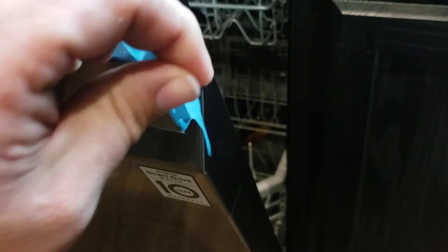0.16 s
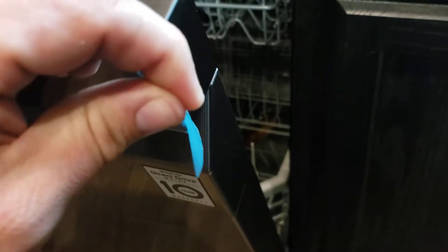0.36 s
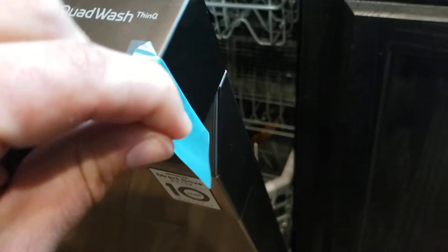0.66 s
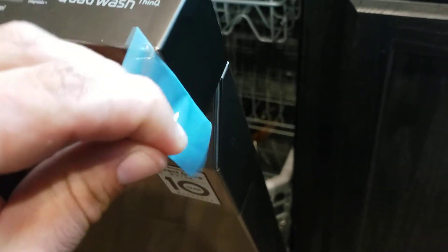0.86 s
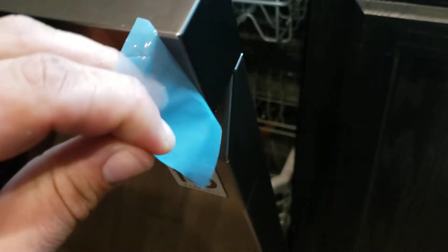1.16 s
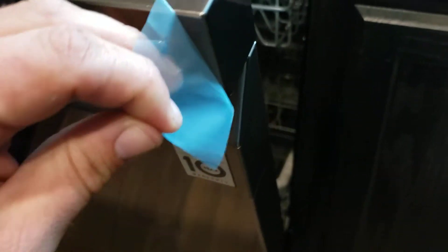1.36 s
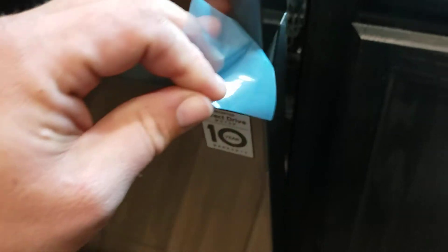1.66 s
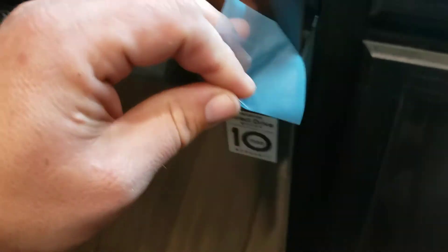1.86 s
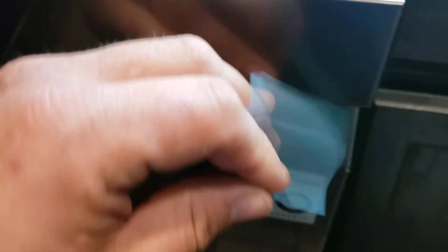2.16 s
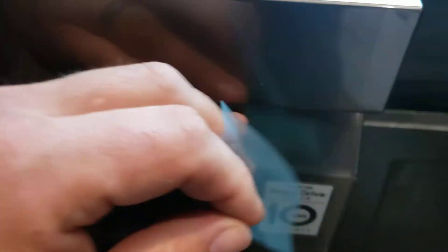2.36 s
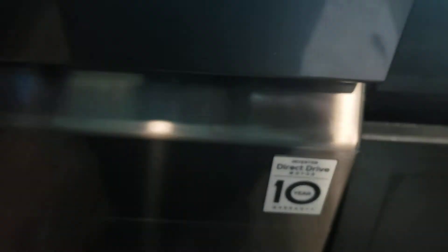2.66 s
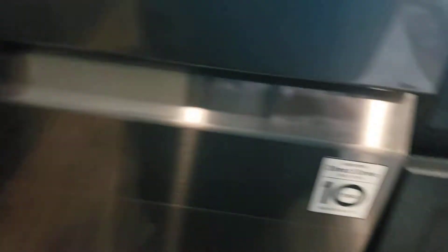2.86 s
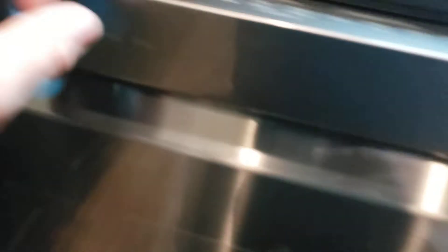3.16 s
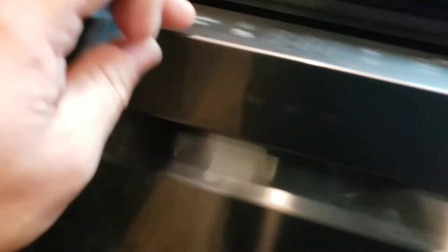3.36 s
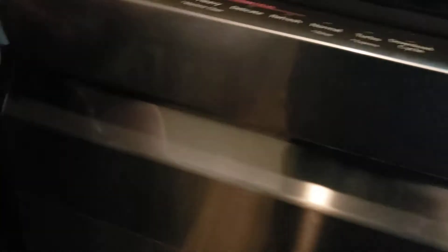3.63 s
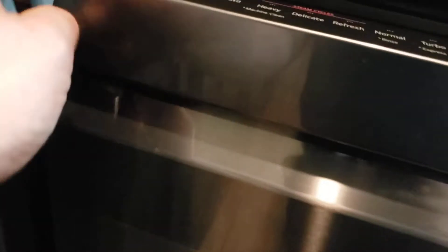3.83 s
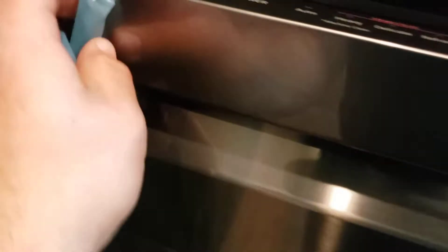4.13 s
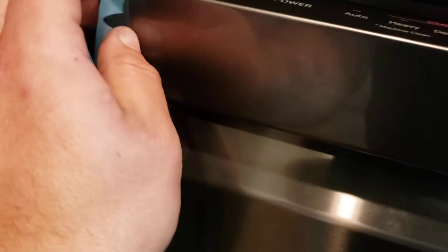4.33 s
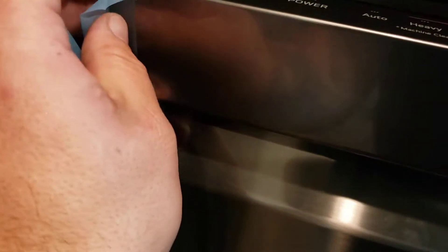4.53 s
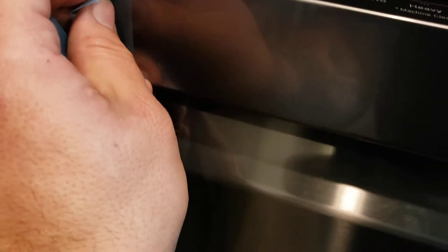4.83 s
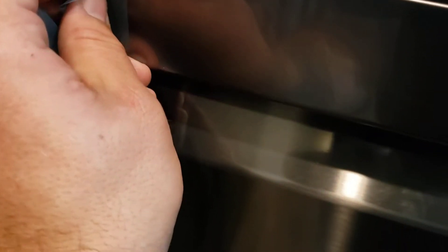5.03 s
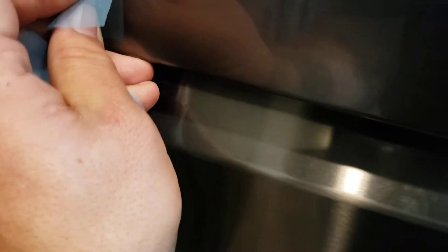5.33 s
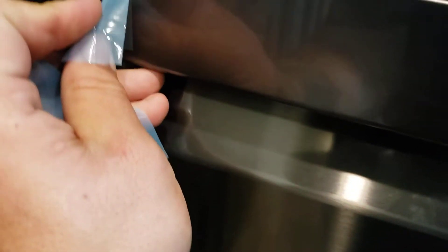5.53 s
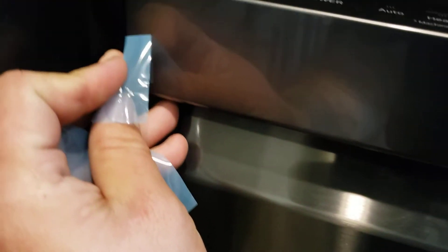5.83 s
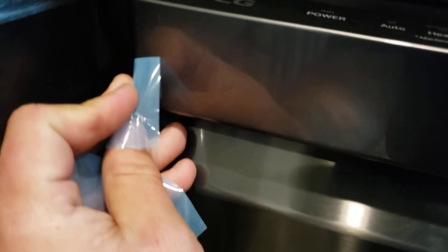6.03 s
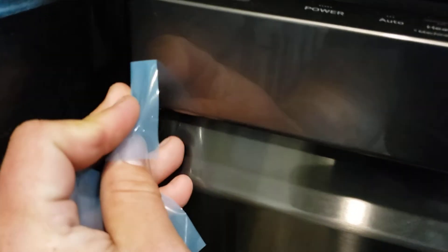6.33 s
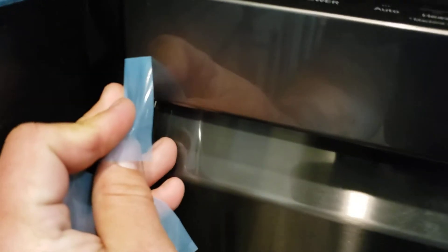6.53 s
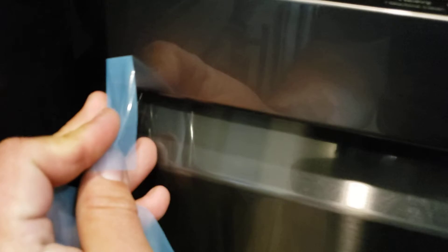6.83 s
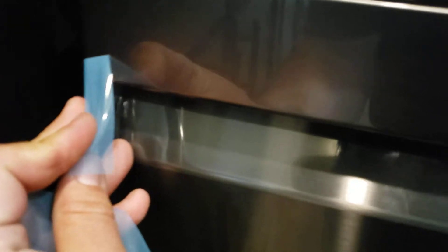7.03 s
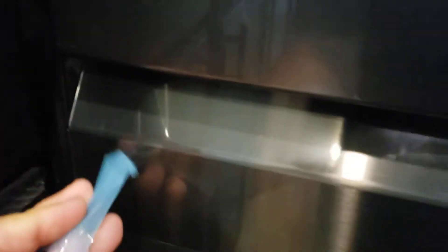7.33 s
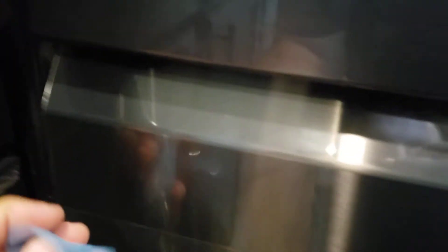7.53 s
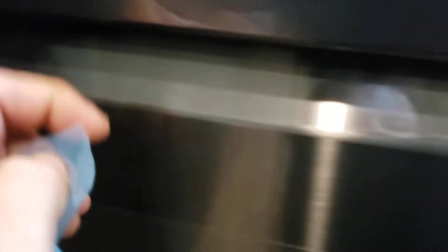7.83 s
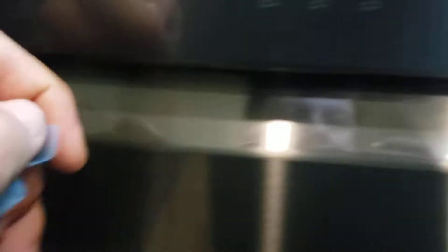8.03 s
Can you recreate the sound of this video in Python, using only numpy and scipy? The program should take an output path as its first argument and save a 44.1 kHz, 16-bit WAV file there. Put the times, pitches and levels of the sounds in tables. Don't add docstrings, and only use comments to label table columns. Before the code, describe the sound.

A handheld stereo phone sits a hand's width from sticky film on a steel door in a quiet kitchen, the right side brighter. Light rustle opens; at 0.2 s a corner jumps off with a sharp snap and low air puff. Cracks cluster at 0.85-0.9 s with another thump, then a loud quick rip at 1.0 s splashes into the room. Sparse faint ticks follow, with a harder pop near 2.2 s and a barely audible finger squeak around 2.8 s. Crackles resume at 3.3-3.5 s. From 3.7 to 4.9 s a nail picks in busy hard snaps, strongest around 4.1 and 4.4 s. It thins to near quiet, with single pops at 5.7, 6.5 and 6.7 s. From 7.1 s the strip tears free in dense crackling and rustling, then crumples brightly, peaking at 8.0-8.15 s. Faint fridge hum and grip rumble continue underneath, the hum fading near the end.

```python
import sys
import numpy as np
from scipy import signal
from scipy.fft import rfft, irfft, next_fast_len
from scipy.io import wavfile
from scipy.ndimage import uniform_filter1d

SR = 44100
rng = np.random.default_rng(int(sys.argv[2]) if len(sys.argv) > 2 else 0)


def natural_amplitude(level_db):
    exponent = np.asarray(level_db, float) / 20
    return 10 ** exponent


def master(y):
    cut = np.clip(np.atleast_2d(y).T, -1, 1)
    pcm = np.round(cut * 32767)
    wavfile.write(sys.argv[1], SR, pcm.astype(np.int16))


N = 361179
SPAN = 2048


def gains(table, size):
    hz, db = np.transpose(table)
    bins = np.fft.rfftfreq(size, 1 / SR)
    return natural_amplitude(np.interp(np.log(bins + 1), np.log(hz + 1.), db))


def colour(x, table):
    size = next_fast_len(N)
    return irfft(rfft(x, size) * gains(table, size), size)[..., :N]


def unit(x):
    return x / np.sqrt(np.mean(x ** 2, -1, keepdims=True))


def curves(table):
    s, *columns = np.transpose(table)
    return [np.interp(np.arange(N) / SR, s, c) for c in columns]


def walk(rate):
    hold = int(SR / rate)
    steps = np.repeat(rng.standard_normal(N // hold + 1), hold)
    return unit(uniform_filter1d(uniform_filter1d(steps, hold), hold)[:N])


def lay(s, bursts):
    out = np.zeros(N + SPAN)
    np.add.at(out, (s * SR).astype(int)[:, None] + np.arange(SPAN), bursts)
    return out[:N]


def creases(rate, spread_db, size):
    when, luck = rng.random((2, size))
    sizes = natural_amplitude(-spread_db * np.log(luck + 1e-3))
    return unit(uniform_filter1d((when < rate / SR) * sizes, size=40))


# t/s, right level/dB, patch f/Hz, treble/dB
JUMP = [
    (0.1856, -19.5, 5500, 6.2),
    (0.19, -35.5, 5200, 10),
    (0.217, -27.5, 4900, 5.6),
]
# t/s, right level/dB, patch f/Hz, treble/dB
RIPS = [
    (1.0077, -17, 5770, -0.5),
    (1.0159, -17, 5380, -1.5),
    (1.0229, -15, 5510, 2.5),
]
# t/s, right level/dB, patch f/Hz, treble/dB
LIFTING = [(0.544, -51, 5070, 7.5), (0.682, -61.5, 6500, 21.5), (0.4894, -39, 3510, -13),
           (0.604, -29.5, 5000, 13), (0.632, -39.5, 5560, 20), (0.773, -41.5, 4040, 13),
           (0.8391, -21.5, 4470, -1.5), (0.8714, -17, 5650, 2), (0.896, -15, 6330, 1.5),
           (1.371, -49, 5700, 11), (2.935, -51, 4500, -9), (1.118, -35.5, 1610, -11),
           (1.202, -26.5, 5640, -10.5), (1.575, -39, 1420, -11.5), (2.066, -38, 4440, -3.5),
           (2.1256, -32.5, 3730, 7), (2.1937, -21.5, 4730, 10), (2.2096, -16.5, 4600, -12),
           (2.7585, -41, 3300, -13), (3.118, -37, 2810, -19), (3.281, -35.5, 3440, 12),
           (3.3151, -28, 6430, 0), (3.318, -34, 2730, 2), (3.363, -36, 5240, 8), (3.3777, -25.5, 2770, 3),
           (3.48, -28, 5900, 10), (3.489, -26, 3400, -9), (3.5111, -18.5, 4650, -2.5),
           (3.5429, -25.5, 4260, 1)]
# t/s, right level/dB, patch f/Hz, treble/dB
PICKING = [(3.725, -33, 4750, -3.5), (3.7457, -24.5, 5800, 34), (3.818, -25, 4800, -4.5),
           (3.8382, -25.5, 6000, -2.5), (3.858, -31, 3880, 14), (4.039, -36.5, 5160, -6),
           (4.1093, -7, 4900, -54.5), (4.1173, -22.5, 5030, -6.5), (4.132, -29.5, 4500, -18.5),
           (4.138, -15.5, 4700, -7), (4.14, -16, 4940, -16), (4.1425, -13, 5540, -38),
           (4.145, -13.5, 5200, -14.5), (4.264, -34, 4670, -38.5), (4.332, -36.5, 4430, -11),
           (4.3405, -27, 4900, -3), (4.3626, -34, 4720, -17), (4.4081, -9.5, 5400, -24.5),
           (4.4853, -18.5, 5300, -5), (4.533, -20.5, 5800, 10), (4.58, -25.5, 5140, -1),
           (4.585, -26, 5300, -6), (4.6156, -32.5, 3280, 1), (4.634, -29, 4000, -5),
           (4.7181, -27.5, 4070, -9), (4.758, -22.5, 3970, -3.5), (4.763, -30.5, 5640, 14),
           (4.775, -17.5, 3820, -3), (4.7803, -22.5, 3780, 10), (4.8486, -22, 5000, -1),
           (4.8504, -25.5, 5200, -5.5), (4.845, -32, 4500, 2), (4.9127, -15.5, 5030, 1)]
# t/s, right level/dB, patch f/Hz, treble/dB
PULLING = [(5.541, -29.5, 3830, -8), (5.601, -31.5, 5840, -4), (5.6746, -30, 6630, -1),
           (5.6823, -16.5, 6200, 0), (5.708, -30, 5370, -3), (6.2438, -33, 2460, -14),
           (6.495, -21.5, 5580, -0.5), (6.7087, -20.5, 4740, -8.5), (6.8399, -26.5, 5500, -5),
           (7.1268, -12.5, 4800, 0), (7.149, -20.5, 4100, -9), (7.2035, -15.5, 6000, 4),
           (7.208, -24.5, 3940, 11), (7.2195, -23, 5870, 8), (7.244, -18.5, 3530, -0.5),
           (7.2596, -19.5, 1210, 14), (7.2663, -21.5, 4500, 11), (7.3033, -31, 1250, 2),
           (7.33, -30.5, 2850, 0), (7.356, -33, 1770, -13), (7.374, -26, 7000, 10), (7.4113, -23, 6240, 15),
           (7.4479, -26, 4650, 20), (7.463, -25, 5000, 26), (7.4828, -34, 980, 15), (7.4977, -27, 4070, 12),
           (7.5086, -24.5, 5860, 19), (7.542, -24.5, 4030, 15), (7.5515, -26.5, 5430, 15)]
# t/s, right level/dB, patch f/Hz, treble/dB
CRUMPLING = [(7.5806, -32, 1780, 19), (7.5872, -28, 4850, -3), (7.645, -26.5, 5500, -6),
             (7.664, -30, 5600, -20), (7.676, -25, 4900, -31), (7.7006, -20.5, 5650, 2.5),
             (7.7197, -31, 5900, 2), (7.7036, -25.5, 5230, 4), (7.7266, -16, 5560, 0.5),
             (7.785, -23, 3680, -0.5), (7.9946, -22.5, 4200, -4), (8.006, -23, 5340, 16),
             (8.011, -33, 5900, 11), (8.0245, -17.5, 5500, 12), (8.0356, -13, 5760, -3.5),
             (8.0421, -12.5, 3500, -15), (8.0561, -16, 3480, -9), (8.068, -22, 2050, 15),
             (8.0792, -12, 3210, -0.5), (8.1087, -20, 4500, -7.5), (8.1118, -23.5, 2120, 20),
             (8.134, -11.5, 5060, -2.5), (8.1557, -23, 7200, 0), (8.1599, -27.5, 5900, 9.5),
             (8.174, -28, 5600, 1), (8.075, -25, 5000, 0), (8.188, -32, 1820, -12)]
# t/s, level/dB, patch f/Hz
TICKS = [(0.5098, -39, 5150), (0.853, -48, 6070), (1.2684, -49, 3470), (1.446, -44.5, 1510),
         (1.88, -56.5, 5470), (2.53, -50.5, 4700), (2.711, -47, 4970), (2.889, -47.5, 5460),
         (3.2945, -46, 3140), (3.348, -38, 5770), (3.4575, -42.5, 5530), (3.506, -27, 6750),
         (3.7004, -47, 5630), (3.766, -42, 4910), (4.014, -53, 5760), (4.677, -45, 7500),
         (4.404, -23, 4500), (5.3235, -37, 3800), (5.403, -39.5, 2660), (5.7792, -47, 6200),
         (5.802, -49, 6420), (5.919, -43.5, 5800), (6.28, -42.5, 5470), (6.3564, -46.5, 5880),
         (6.402, -41, 1680), (6.7968, -51, 6550), (6.9185, -35, 5630), (7.905, -40.5, 5300),
         (0.82, -47, 3500), (1.5765, -40.5, 4350), (2.465, -47.5, 4740), (2.727, -48, 3980),
         (2.769, -45, 3500), (2.794, -52, 3500), (2.901, -46.5, 2300), (3.2562, -60, 6030),
         (3.3403, -41, 5620), (3.629, -49, 6000), (3.708, -57, 5550), (5.0493, -52.5, 4870),
         (5.386, -48, 5220), (5.5176, -55.5, 4910), (5.98, -52.5, 5880), (6.019, -48, 6540),
         (6.0674, -52, 3800), (6.225, -57, 6500), (6.3318, -60, 6500), (6.813, -52, 6660),
         (7.0295, -45, 2860), (7.972, -54, 3680), (8.0091, -20.5, 5320), (6.65, -54, 6550),
         (5.8704, -58, 6800), (5.82, -53, 4570), (2.185, -58, 6500), (0.59, -53, 3000), (4.313, -51, 4500),
         (4.767, -34, 4500), (4.802, -38, 2500), (5.1, -51, 3000), (5.243, -61, 7400)]
# t/s, right level/dB, patch f/Hz,
# length/s
ZIPS = [(0.198, -32, 5830, 0.013), (1.024, -31.5, 3960, 0.045), (1.428, -58, 5500, 0.0044),
        (1.441, -47.5, 5660, 0.0048), (1.485, -57, 6540, .005), (1.585, -45.5, 1070, 0.0069),
        (1.586, -44.5, 4770, 0.0022), (1.606, -54, 1280, 0.013), (1.62, -55.5, 4800, 0.026),
        (2.195, -37, 4970, 0.027), (2.706, -56, 4300, 0.012), (2.748, -53.5, 2460, 0.04),
        (2.894, -48, 4860, 0.0063), (3.209, -54, 4970, 0.0046), (3.27, -53, 2300, 0.008),
        (3.287, -45.5, 4150, 0.0099), (3.471, -40.5, 3040, 0.0063), (3.496, -25, 3440, 0.02),
        (3.51, -18.5, 4400, 0.0045), (3.736, -50, 4800, 0.014), (4.045, -51.5, 5060, 0.016),
        (6.244, -43, 5260, 0.0092), (6.246, -44.5, 2600, 0.0074), (7.208, -18, 5140, 0.0029),
        (7.265, -29.5, 3140, 0.0089), (7.443, -38, 4500, 0.003), (7.448, -36, 3240, .008),
        (7.5165, -33, 4300, .004), (7.57, -37.5, 4970, 0.034), (7.698, -26, 5600, 0.0044),
        (7.7, -30, 2050, 0.0052), (7.722, -22, 5470, 0.008), (7.725, -27, 2290, 0.012),
        (8.042, -20, 5330, 0.0025), (8.068, -20.5, 1910, 0.0025), (8.079, -31, 1940, .008),
        (8.106, -40, 1800, 0.012), (4.136, -28, 4960, 0.0073), (5.68, -28, 2450, 0.0094),
        (3.38, -34.5, 5670, 0.0089), (3.743, -37, 3900, 0.0079), (3.839, -39.5, 4500, 0.025),
        (7.22, -35.5, 1000, 0.03), (7.283, -43, 1110, 0.031), (7.596, -40.5, 2480, 0.018),
        (6.837, -49.5, 895, 0.0089),
        (7.631, -45, 5000, .003), (2.559, -60, 3900, 0.0067), (5.121, -59, 4600, .004),
           (4.324, -44, 4300, .008), (4.342, -48.5, 3100, 0.0037), (8.112, -26, 1830, .006),
           (7.543, -30, 3800, 0.0044), (4.4, -57, 1400, .004), (4.5, -44.5, 950, 0.012),
           (6.495, -26, 2350, 0.0017), (3.867, -29, 3850, 0.0029), (3.28, -41, 2530, 0.01),
           (0.94, -48.5, 8000, 0.0068), (0.92, -46.5, 4500, .004), (7.31, -46, 2500, .02),
           (8.1, -44, 1600, 0.0063), (1.6, -58, 3700, .004)]
SCATTER_DB = [
    -11.5,
    -13,
    -19,
    -21,
    -20,
    -20,
    -14.5,
    -16.5,
]
LOWEST_HZ = [
    4002,
    403,
    489,
    997.5,
    901,
    1500,
    1007,
    0,
]


def releases():
    treble_per_octave_db, zip_treble_db, zip_lowest_share = 12, -0.5, 0.6
    ticks = [(s, db, hz, treble_per_octave_db * np.log2(hz / 5000)) for s, db, hz in TICKS]
    runs = ZIPS
    zips = [(s, db, hz, zip_treble_db + treble_per_octave_db * np.log2(hz / 5000)) for s, db, hz, _ in runs]
    tables = (JUMP, RIPS, LIFTING, PICKING, PULLING, CRUMPLING, ticks, zips)
    rows = []
    for table, scatter, lowest in zip(tables, SCATTER_DB, LOWEST_HZ):
        rows += [tuple(row) + (scatter, lowest) for row in table]
    s, db, hz, treble_db, scatter_db, low_hz = np.transpose(rows)
    scatter_db = scatter_db + 0.33 * np.clip(treble_db, -15, 10) + 0.1251 * (db + 14.5)
    length = np.r_[np.zeros(len(s) - len(zips)), [row[-1] for row in runs]]
    low_hz = np.where(length > 0, zip_lowest_share * hz, low_hz)
    return s, db, hz, treble_db, scatter_db, low_hz, length


def tears(hz, length, lead):
    t = np.arange(SPAN) / SR
    slow = 0.00065 * (5000 / hz) ** 0.5
    creep = 0.96 * np.exp((t - lead) / 0.0003) + 0.04 * t / lead
    let_go = np.exp(np.minimum(lead + length - t, 0) / slow)
    stutter = 0.35 + creases(500, 2.5, len(hz) * SPAN).reshape(-1, SPAN)
    return np.where(t < lead, creep, let_go) * np.where(length > 0, stutter, 1)


# f/Hz, level/dB
TAIL = [(2100, 1), (2800, 0.5), (3300, -3.5), (4300, -2), (6800, -5.5), (8800, -8.5), (11500, -5)]


def splash(sent, room_db=-14):
    t = np.arange(SR // 2) / SR
    quick = np.exp(-np.log(1000) * t / 0.07)
    room = natural_amplitude(room_db) * np.exp(-np.log(1000) * t / 0.5)
    echo = rng.standard_normal((2, len(t))) * (quick + room) * natural_amplitude(-15.5)
    wet = colour(signal.fftconvolve(sent[None], echo, axes=1)[:, :N], TAIL)
    return wet * (0.8 + 0.35 * creases(600, 2.5, N))


# f/Hz, level per Hz/dB
FILM = [(180, -36), (300, -19.5), (460, -11.5), (937, 1), (1500, 0.5), (1700, 1.5), (3670, 5.5), (4420, 0),
        (5170, 7.5), (9000, -7), (11700, -26), (19800, -120)]
# f/Hz, level per Hz/dB
SHEEN = [(6500, -19), (8300, -14), (10000, -6), (11500, 0.5), (13000, 2), (15500, -1), (17000, -9)]


def snaps(s, db, hz, treble_db, scatter_db, low_hz, length, sharp=1.43, wide_db=-8, alike_hz=1300):
    hz, low_hz, run = hz[:, None], low_hz[:, None], length[:, None]
    treble_db = np.minimum(treble_db, 5)[:, None]
    f = np.fft.rfftfreq(SPAN, 1 / SR) + 1
    lead = 0.004
    chance = rng.standard_normal((len(s), 2, SPAN))
    tear = tears(hz, run, lead)
    db = db + 10 * np.log10(1 + length / 0.002)
    patch = 1 / (1 + 1j * sharp * natural_amplitude(-0.2 * treble_db) * (f / hz - hz / f)) ** 2
    film = gains(FILM, SPAN) / (1 + (low_hz / f) ** 4)
    gloss = gains(SHEEN, SPAN)
    wide = natural_amplitude(wide_db + 0.27 * treble_db)

    near, far = rfft(chance[:, 0] * tear), rfft(chance[:, 1] * tear)
    alike = 1 / (1 + (f / alike_hz) ** 2)
    left = np.sqrt(alike) * near + np.sqrt(1 - alike) * far
    ports = []
    for noise in (left, near):
        ring, crack, sheen = (unit(np.roll(irfft(noise * g), 12, 1)) for g in (patch, film, gloss))
        body = (ring + wide * crack) / np.sqrt(1 + wide ** 2) + natural_amplitude(treble_db) * sheen
        ports.append(body * (natural_amplitude(db) * np.sqrt(0.0012 * SR / SPAN))[:, None])

    bumps = uniform_filter1d(uniform_filter1d(chance[:, 0, :len(f)], size=22), size=12)
    ripple = natural_amplitude(2.5 * unit(bumps))
    spectra = (abs(patch) ** 1.1 * film, film, gloss)
    ring, crack, sheen = (unit(np.roll(irfft(g * ripple), 80, -1)) for g in spectra)
    even = ring + natural_amplitude(8.0) * wide * crack + natural_amplitude(treble_db + 5.5) * sheen
    sent = lay(s, even * (natural_amplitude(db + scatter_db) * np.sqrt(0.00079 * SR / SPAN))[:, None])
    direct = np.array([lay(s - lead, ports[0]), lay(s - lead + 0.0002, ports[1])])
    return direct + splash(sent)


# t/s, rustle level/dB, left level by hand position/dB
RUSTLE = [(0, -50.5, 1.5), (.3, -81, -3.5), (1.6, -57.5, -2), (2.0, -76, -3), (2.75, -70, -1),
          (3.85, -60, -4.5), (4.05, -82, -1.5), (4.6, -60.5, 0.5), (4.75, -74.5, -5.5), (5.9, -73, -2),
          (5.99, -58, 1), (6.4, -74, -4.5), (6.89, -72, -4), (6.93, -56, -0.5), (7.345, -51, -1),
          (7.67, -43, 2.5), (7.9, -71.5, 2), (8.1, -53.5, -2.5)]


def rustle(slack_db=-4, hiss=1.0, patchy_db=1.5):
    db = curves(RUSTLE)[0]
    rough = creases(1100, 2.5, N) * natural_amplitude(2.2 * walk(40))
    rough = rough * np.clip((db + 70) / 25, 0.25, 0.8)
    grain = rng.standard_normal((2, N)) * (rough + hiss)
    film = unit(colour(grain, FILM))
    slack = colour(film, [(2400, 0), (3300, -40)])
    glossy = natural_amplitude(-0.5) * unit(colour(grain, SHEEN))
    swell = natural_amplitude(db + 2.2 * walk(10.0))
    return swell * sum(part * natural_amplitude(patchy_db * walk(14)) for part in (natural_amplitude(slack_db) * slack, film - slack, glossy))


# t/s, peak level/dB, body f/Hz
FLAPS = [(0.541, -47, 342), (0.663, -42, 237), (0.771, -39.5, 290), (0.836, -37, 426), (1.057, -32, 248),
         (3.366, -45, 334), (4.486, -44.5, 220), (4.76, -40, 180.4), (5.678, -42.5, 462), (7.235, -41, 253),
         (7.261, -32, 283), (4.14, -44.5, 293), (7.499, -44, 416), (7.42, -38.5, 310), (7.58, -43, 355),
         (2.35, -49, 351), (3.7, -43.5, 150), (3.799, -59, 130), (3.88, -61, 200), (4.33, -47, 200),
         (4.6, -42.5, 250), (1.3, -66, 400), (7.75, -49, 355)]
# t/s, peak level/dB, body f/Hz
SLIDES = [(0.186, -31, 1600), (0.226, -39, 2100), (0.605, -37, 1930), (2.34, -45.5, 2150),
          (2.365, -47, 1500), (2.395, -51, 2600), (4.579, -33, 2410), (6.836, -43, 2520),
          (7.207, -27, 2720), (7.226, -29.5, 1040), (7.29, -30, 1660), (3.503, -45, 3060),
          (3.861, -40, 3800), (5.679, -49, 2640), (7.697, -43, 2110), (7.72, -37, 2150)]


def flaps(sharp=1.04, crisp_db=-6, fade_s=0.015):
    s, db, hz = (c[:, None] for c in np.transpose(FLAPS + SLIDES))
    t, f = np.arange(SPAN) / SR, np.fft.rfftfreq(SPAN, 1 / SR) + 1
    noise = rfft(rng.standard_normal((len(s), SPAN)))
    thin = np.minimum(hz / 1500, 1)
    narrow = sharp * np.minimum(700 / hz, 1)
    body = unit(irfft(noise / (1 + 1j * narrow * (f / hz - hz / f)) ** 2))
    crisp = unit(irfft(noise * (gains(FILM, SPAN) + natural_amplitude(-4.0) * gains(SHEEN, SPAN)))) * thin
    swell = (1 - np.exp(-t / 0.0082)) * np.exp(-t / fade_s)
    swell = swell * np.minimum(1, (t[-1] - t) / 0.019)
    grain = 1 + thin * (0.6 * creases(700, 3, len(s) * SPAN).reshape(-1, SPAN) - 0.3)
    return lay(s[:, 0], (body + natural_amplitude(crisp_db) * crisp) * grain * swell * natural_amplitude(db))


# t/s, level/dB, f/Hz, time to fade by 60 dB/s
PUFFS = [
    (0.1856, -12.5, 63, 0.1),
    (0.8718, -10, 66.5, 0.04),
    (1.024, -33, 79, 0.078),
    (3.758, -39, 69, 0.085),
    (4.534, -29.5, 64.4, 0.073),
    (4.915, -29, 60, 0.05),
    (8.025, -38.5, 73, 0.12),
]


def puffs(left_db=-18):
    out = np.zeros(N)
    for s, db, hz, t60 in PUFFS:
        t = np.maximum(np.arange(N) / SR - s, 0)
        swing = np.sin(2 * np.pi * hz * t) * np.exp(-np.log(1000) * t / t60)
        suck = 2.84 * t / 0.00075 * np.exp(-t / 0.00036)
        out += 1.24 * natural_amplitude(db) * (swing - suck)
    return out * np.array([[natural_amplitude(left_db)], [1]])


def tone(table):
    hz, db = curves(table)[:2]
    return np.sqrt(2) * natural_amplitude(db) * np.sin(2 * np.pi * np.cumsum(hz) / SR)


# t/s, f/Hz, level/dB
SQUEAK = [
    (2.619, 1040, -86),
    (2.72, 1084, -77),
    (2.824, 1180, -70.5),
    (2.89, 1090, -78),
]


def squeak():
    t = np.arange(N) / SR
    inside = np.minimum(t - SQUEAK[0][0], SQUEAK[-1][0] - t)
    return tone(SQUEAK) * np.clip(inside / 0.021, 0, 1)


def effort():
    t = np.arange(N) / SR
    rise_s, relax_s, rest = 0.033, 0.11, 0.18
    late = (t - row[0] for row in FLAPS + PUFFS[1:])
    return rest + sum(np.exp(-(d / np.where(d < 0, rise_s, relax_s)) ** 2) for d in late)


def grip():
    rumble = colour(rng.standard_normal(N), [(70, -9.0), (300, -11.0), (600, -22.0), (1200, -52.5)])
    return unit(rumble) * np.sqrt(effort()) * natural_amplitude(-62) * natural_amplitude(2.3 * walk(25))


# t/s, level/dB
HUM = [(0, -65), (1.1, -66), (3.201, -64), (3.8, -56), (4.798, -59.5), (6.7, -60), (7.302, -59), (7.9, -87),
       (8.19, -95)]


def fridge(noise):
    buzz = unit(colour(noise, [(95, -32.5), (108, 1.5), (126, 3.0), (145, -50.0)]))
    buzz_db = np.interp(np.arange(N) / SR - 2.75, [0, 0.77], [-89.5, -65])
    return tone([(s, 53.8, db) for s, db in HUM]) + buzz * natural_amplitude(buzz_db)


# f/Hz, level per Hz/dB
ROOM = [(18, -46.5), (30, -11.5), (65, 4), (96, -8), (128, -7.5), (368, -11.5), (547, -21.5), (1060, -18),
        (1270, -29), (1800, -21), (2200, -10.5), (2970, -30), (5030, -20.5), (8310, -55), (14800, -36.5),
        (16500, -40)]
# f/Hz, left minus right level/dB
ROOM_PORTS = [(60, -5), (110, -10.5), (200, -1), (380, 2), (700, -2.5), (1290, 5), (2380, 15.5),
              (4400, -13), (8120, -25), (15000, -7.5)]


def kitchen():
    both, own = rng.standard_normal(N), rng.standard_normal((2, N))
    air = colour(both, [(500, -4.0), (1200, -28.0)]) + colour(own, [(100, -9.5), (900, 0.0)])
    air = colour(air, ROOM)
    air = air / np.sqrt(np.mean(air ** 2)) * natural_amplitude(-55 - 11.5 + 0.63 * walk(2.1))
    shade = gains(ROOM_PORTS, N)
    tilt = np.sqrt(2 / (1 + shade ** 2)) * np.array([shade, np.ones_like(shade)])
    low = fridge(both) + grip()
    return irfft(rfft(air) * tilt, N) + low * natural_amplitude(np.array([[-1.], [1.]]))


# f/Hz, left minus right level/dB
PORTS = [(60, 5.5), (110, -7), (200, 3), (380, -3.5), (700, 1.5), (1290, -0.5), (2380, 1.5), (4400, -14.5),
         (8120, -10.5), (15000, -3)]


def scene():
    film = snaps(*releases()) + rustle() + flaps()
    film[0] = colour(film[0] * natural_amplitude(curves(RUSTLE)[1]), PORTS)
    return film + squeak() + puffs() + kitchen()


def top_cut(x):
    return signal.sosfilt(signal.butter(12, 17150, fs=SR, output="sos"), x)


def record(dry):
    top = colour(dry, [(15700, 0.5), (16300, -11.5), (16900, -31.5), (17200, -71.5)])
    mix = np.clip(top, -1, 1)
    return top_cut(mix)


dry = scene()
out = record(dry)
master(out)
```